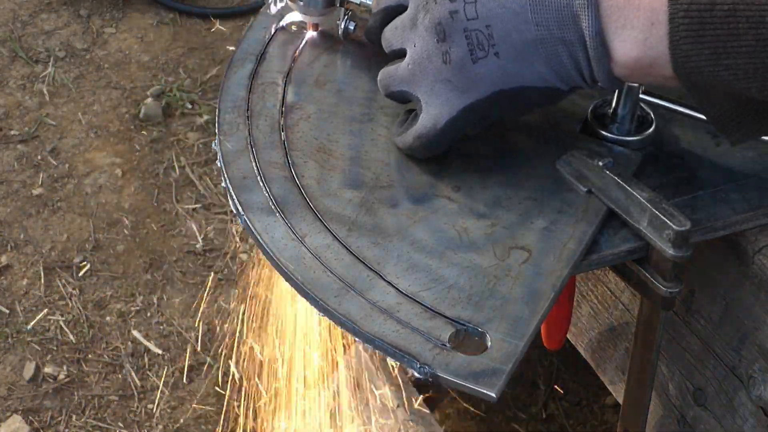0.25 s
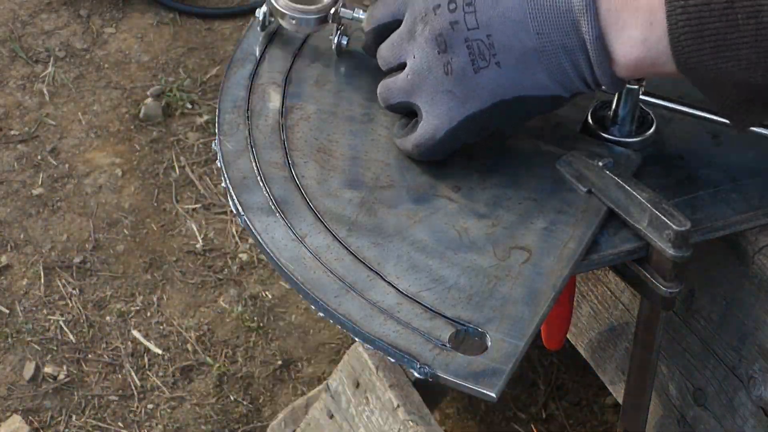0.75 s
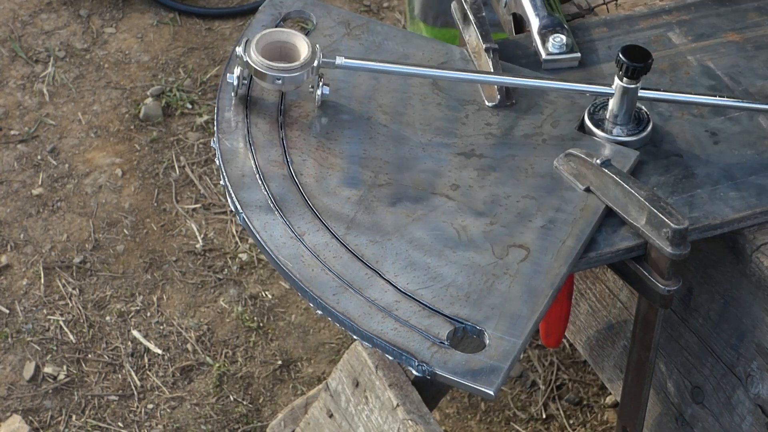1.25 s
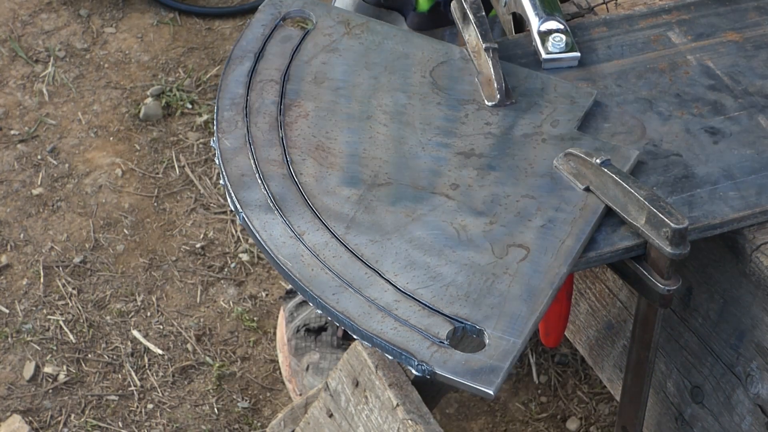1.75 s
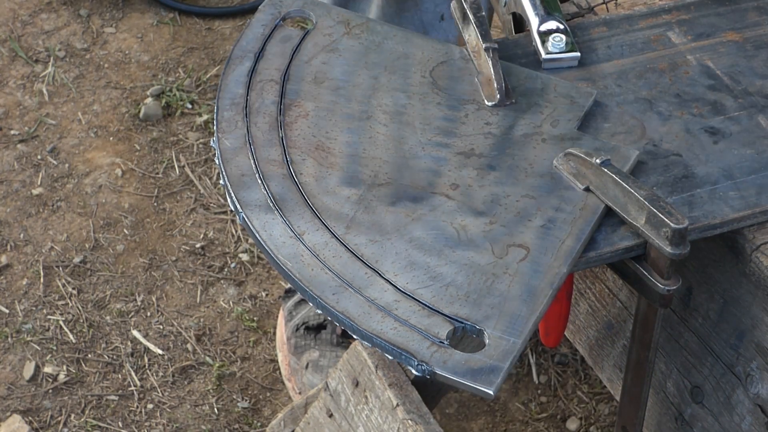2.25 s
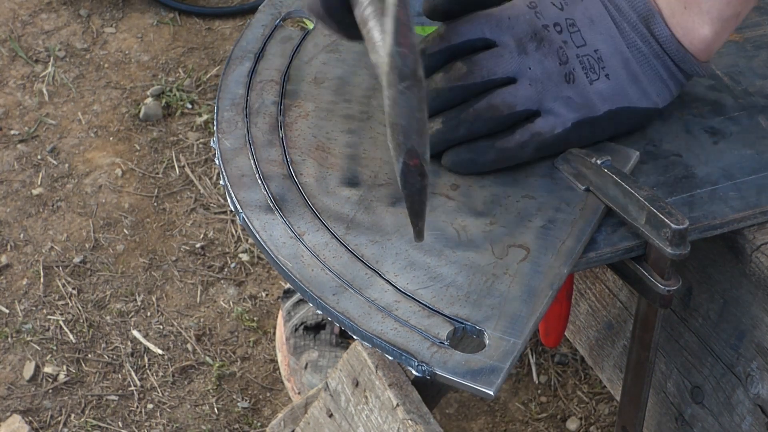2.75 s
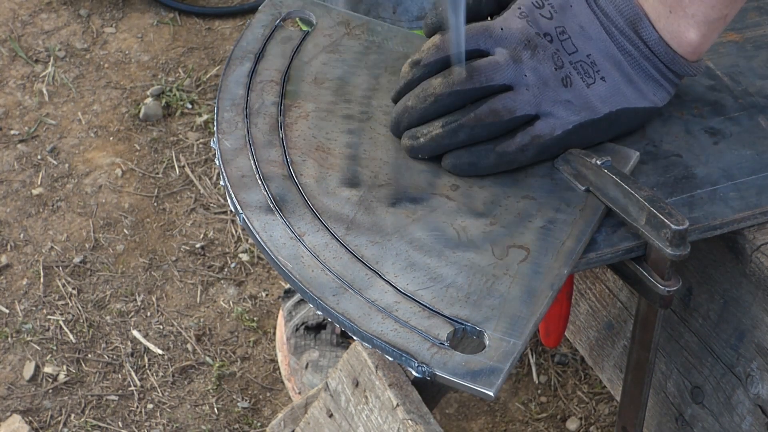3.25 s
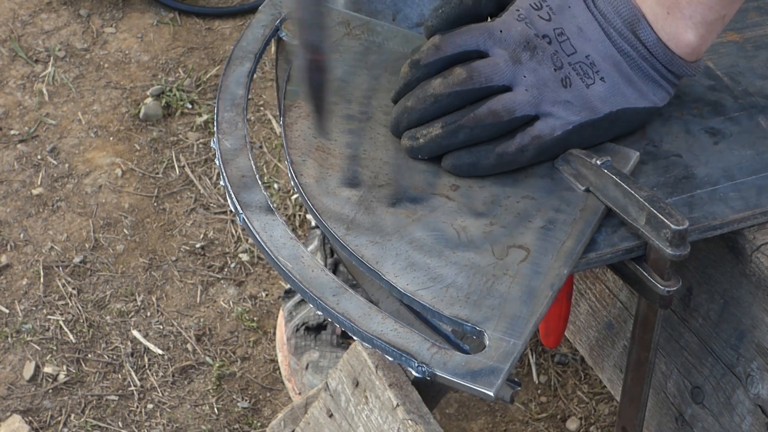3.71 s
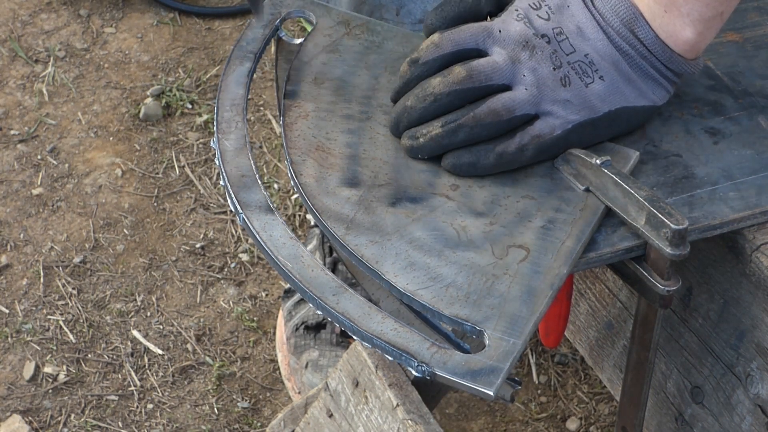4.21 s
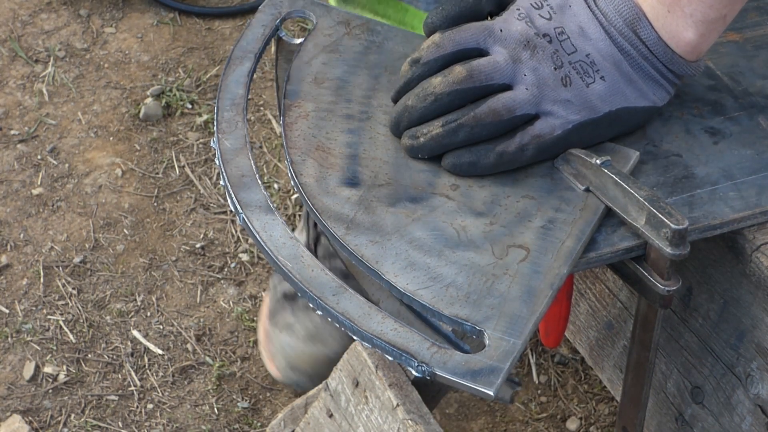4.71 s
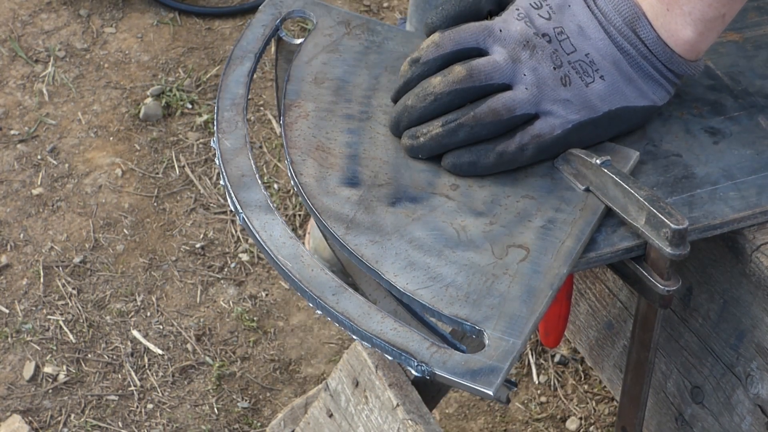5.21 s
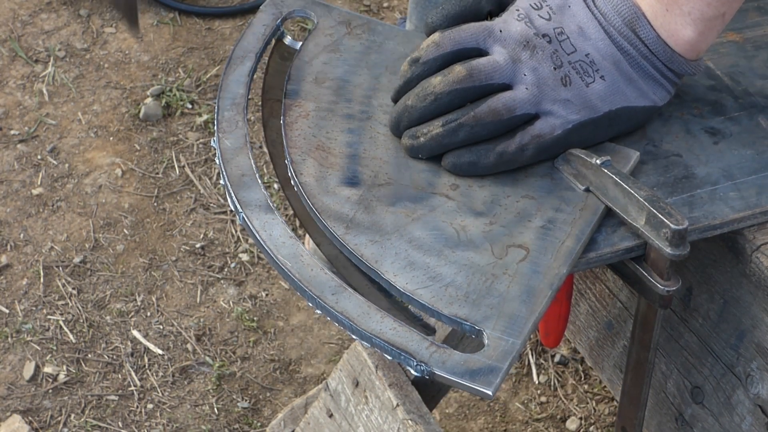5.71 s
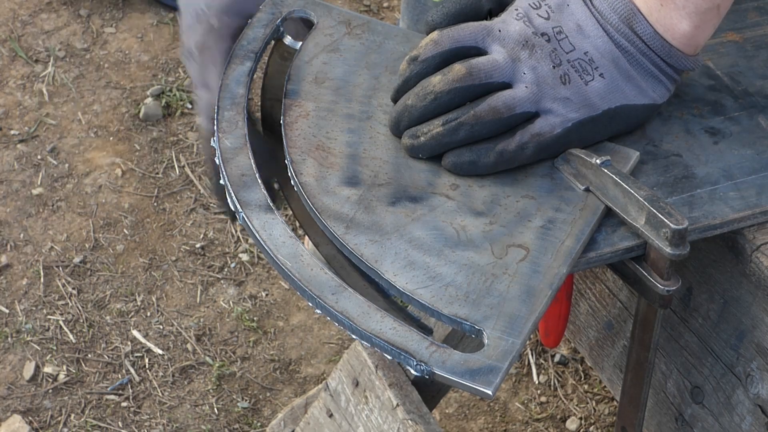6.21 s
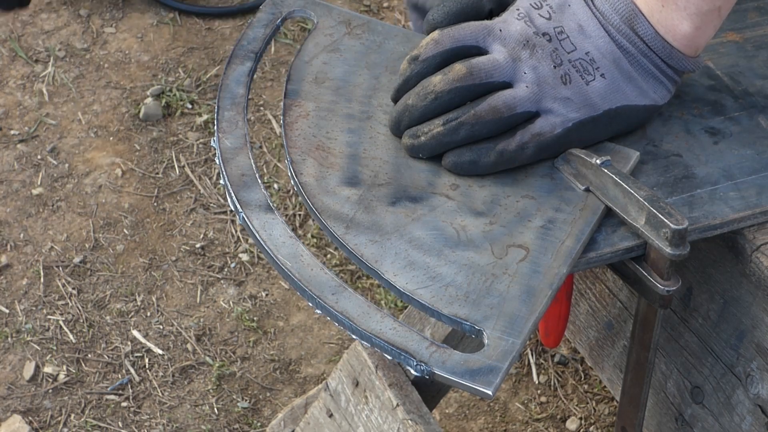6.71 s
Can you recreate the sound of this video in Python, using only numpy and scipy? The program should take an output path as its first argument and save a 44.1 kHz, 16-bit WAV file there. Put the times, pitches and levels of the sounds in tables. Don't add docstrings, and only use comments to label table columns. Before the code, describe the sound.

Harsh cutting-torch roar pops off into an air jet, followed by steady compressor drone and irregular metallic hammer strikes knocking an offcut loose.

```python
import sys
import numpy as np
from scipy import signal
from scipy.io import wavfile

SR = 44100
rng = np.random.default_rng(int(sys.argv[2]) if len(sys.argv) > 2 else 0)


def generate_wav(sig):
    pcm = np.round(np.clip(np.atleast_2d(sig).T, -1, 1) * 32767).astype(np.int16)
    wavfile.write(sys.argv[1], SR, pcm)


def attenuation_scalar(level_db):
    decades = np.asarray(level_db, float) / 20
    return 10 ** decades


N = 306936
TIME = np.arange(N) / SR

STROKE_HZ = 45.796
ARC_OFF_S = .64
# centre_s, fade_out_s, fade_in_s
SCENE_CHANGES = [
    (1.5637, 0.037, 0.029),
    (6.93, 0.035, 0.037),
]
# frequency_hz, width_hz, lift_db
CASING_RINGS = [(1510, 81, 3.5), (4045, 97, 10), (4975, 140, 6.5), (5800, 480, 6.5), (6890, 120, 7.5),
                (7510, 68, 11), (8270, 130, 6), (10260, 23, 1.5)]
# frequency_hz, likeness (0 to 1)
LIKENESS = [(60, 0.41), (150, 0.45), (380, 0.88), (950, 0.3), (2380, 0.75), (5980, 0.89), (15000, 0.26)]
# frequency_hz, left_minus_right_db
LEAN = [(60, -1), (150, -1), (380, -0.5), (950, 4), (2380, 4.5), (5980, 1.5), (15000, 3)]


def rms_one(x):
    return x / np.sqrt(np.mean(x ** 2) + 1e-20)


def in_time(rows, outside=None):
    return np.interp(TIME, *np.transpose(rows), left=outside, right=outside)


def at_hz(points, hz):
    table_hz, values = np.array(points).T
    return np.interp(np.log(hz), np.log(table_hz), values)


def ramp(start_s, takes_s):
    return np.clip((TIME - start_s) / takes_s, 0, 1)


def drift(rate_hz, size=N):
    r = np.exp(-80 * np.pi * rate_hz / SR)
    white = rng.standard_normal(size // 40 + 2002)
    slow = signal.lfilter([1], [1, -2 * r, r * r], white)[2000:]
    return np.interp(np.arange(size) / 40, np.arange(len(slow)), rms_one(slow))


def sides(db):
    return attenuation_scalar(np.array([[.5], [-.5]]) * db)


def strikes(rows):
    return sum(attenuation_scalar(db) * (np.arange(N) == round(s * SR)) for s, db in rows)


def ring(clicks, hz, t60):
    r = attenuation_scalar(-60 / (t60 * SR))
    w = 2 * np.pi * hz / SR
    return signal.lfilter([0, np.sin(w)], [1, -2 * r * np.cos(w), r * r], clicks + 1e-18)


def resonate(x, peaks):
    for hz, width_hz, db in peaks:
        r = np.exp(-np.pi * width_hz / SR)
        poles = [1, -2 * r * np.cos(2 * np.pi * hz / SR), r * r]
        peak = signal.lfilter([(1 - r * r) / 2, 0, (r * r - 1) / 2], poles, x)
        x = x + (attenuation_scalar(db) - 1) * peak
    return x


def banded_noise(spectrum, likeness, patchy_db, seconds=N / SR, lean=1):
    size = round(seconds * SR)
    edges = 22 * 2 ** np.arange(0, 9.8, .5)
    white = rng.standard_normal((2, 2, size))
    out = 0
    for k, (low, high) in enumerate(zip(edges, edges[1:])):
        hz = np.sqrt(low * high)
        if at_hz(spectrum, hz) < -50 or hz < spectrum[0][0]:
            continue
        band = signal.butter(2, [low, high], "band", fs=SR, output="sos")
        mid, side = signal.sosfilt(band, white[k % 2])
        alike = np.clip(at_hz(likeness, hz), 0, 1)
        gain = attenuation_scalar(at_hz(spectrum, hz) + patchy_db * drift(27, size=size)) * sides(lean * at_hz(LEAN, hz))
        out = out + gain * (np.sqrt(1 + alike) * mid + np.sqrt(1 - alike) * side * [[1], [-1]])
    return np.pad(rms_one(out), ((0, 0), (0, N - size)))


def arc_roar(likeness):
    # time_s, level_db
    arc_level = [(0.0, -21.5), (0.09, -25.5), (0.112, -20), (0.2, -21.5), (0.304, -23.5), (0.44, -20),
                 (0.46, -22), (0.624, -19), (0.64, -28)]
    # frequency_hz, density_db
    arc_spectrum = [(350, -43), (600, -6.5), (634, -26), (881, -12), (997, -16), (1640, -3), (2990, -9.5),
                    (3250, -8), (9620, -1.5), (14500, -9.5), (16000, -19)]
    # frequency_hz, width_hz, lift_db
    arc_rings = [(1600, 100, 5.5), (3990, 70, 7), (5280, 100, 6), (8050, 210, 5), (8800, 95, 4),
                 (9470, 98, 5), (9600, 44, 6), (11900, 67, 8)]
    size = round(.7 * SR)
    noise = banded_noise(arc_spectrum, likeness, 1.24, seconds=.7, lean=0)
    roar = rms_one(resonate(noise, arc_rings)[:, :size])
    roar = np.pad(roar, ((0, 0), (0, N - size)))
    return roar * attenuation_scalar(in_time(arc_level, outside=-90) + 0.32 * drift(40))


def sputter(arc):
    # start_s, pop_db, gap_delay_s
    sputters = [
        (0.608, -8, 0.0085),
        (0.619, -10, 0.0013),
        (0.632, -15, 0.0044),
    ]
    pops = np.zeros(N)
    for s, db, gap in sputters:
        arc = arc * (1 - 0.59 * np.exp(-((TIME - s - gap) / gap * 2) ** 2))
        pops += attenuation_scalar(db) * (TIME >= s) * np.exp(-np.abs(TIME - s) / .003)
    band = signal.butter(1, [250, 2200], "band", fs=SR, output="sos")
    return arc + signal.sosfilt(band, pops * rng.standard_normal(N))


def jet_db():
    trickle_db, air_db, opens_s, rise_s = -32, -27, .675, .02
    lift_s, lift_takes_s, turned_db = 0.846, .07, -3.5
    gust_s, gust_db, gust_rise_s, gust_dies_s = .778, 8, 0.013, 0.025
    splash_db, splash_grows_db_per_s, splash_lifted_db = -40, 26, -16

    lifted = ramp(lift_s, lift_takes_s)
    gust_age = np.maximum(TIME - gust_s - gust_rise_s, 0)
    gust = gust_db * ramp(gust_s, gust_rise_s) * np.exp(-gust_age / gust_dies_s)
    turning = turned_db * ramp(gust_s, lift_s - gust_s + lift_takes_s)
    air = trickle_db + (air_db - trickle_db) * ramp(opens_s, rise_s) + gust + turning
    splash = splash_db + splash_grows_db_per_s * (TIME - ARC_OFF_S) + splash_lifted_db * lifted
    silent = -90 * ((TIME < ARC_OFF_S) | (TIME > SCENE_CHANGES[0][0]))
    return air + silent, splash + silent - 90 * (lifted == 1)


def cooling_air(likeness):
    # frequency_hz, density_db
    air_spectrum = [(1470, -48), (2500, -14.5), (3060, -19), (3130, -25), (5440, -6), (5920, -10.5),
                    (9730, -4), (14400, -11), (16000, -15)]
    # frequency_hz, density_db
    splash_spectrum = [(1000, -8), (1600, 3), (2400, -6), (3800, 1), (5000, -15)]
    air_db, splash_db = jet_db()
    air = banded_noise(air_spectrum, likeness, 1.4, seconds=1.6, lean=0) * attenuation_scalar(air_db)
    splash = banded_noise(splash_spectrum, likeness, 1.3, seconds=1.0, lean=0) * attenuation_scalar(splash_db)
    return air + splash


def torch():
    # frequency_hz, likeness (0 to 1)
    torch_likeness = [(60, 0.7), (180, 0.97), (550, 0.66), (1650, 0.87), (4970, 0.89), (15000, 0.77)]
    return sputter(arc_roar(torch_likeness)) + cooling_air(torch_likeness)


def blow_colour(hz, bright_db, favoured_hz):
    return bright_db * np.log2(hz / 2000) + 9 * np.exp(-(np.log2(hz / favoured_hz) / .42) ** 2)


def plate_modes(age, bright_db, lasting, favoured_hz):
    # frequency_hz, level_db, t60_s
    modes = [(240, -30, 0.033), (335, -23, 0.15), (516, -10, 0.12), (726, -6, 0.042), (1010, -23, 0.05),
             (1040, -34, .05), (1110, -5.5, 0.12), (1300, -11, 0.073), (1397, 3, 0.08), (1534, -8, 0.16),
             (1584, -2, 0.043), (1780, 0.5, 0.06), (1877, 0.5, 0.045), (2177, 5.5, 0.081),
             (2200, -3, 0.077), (2400, 3, 0.2), (2530, 4, 0.072), (2900, -6, 0.043), (3350, -18, 0.044),
             (3520, -15, .04), (4500, -45, 0.022), (4900, 8, 0.039), (5670, -11, .03), (5840, 13, 0.029),
             (6400, -30, 0.022), (7800, 16, .025), (11950, 13.5, 0.034)]
    rattle = rng.standard_normal(len(age)) * np.exp(-age / (0.014 * lasting)) * 0.087
    rattle[0] = 1
    out = 0
    for hz, db, t60 in modes:
        uneven_db, apart_db = 2 * rng.standard_normal(2)
        gain = attenuation_scalar(db - 4.5 + blow_colour(hz, bright_db, favoured_hz) + uneven_db) * sides(apart_db)
        longest_s = 150 / hz
        out = out + gain * ring(rattle, hz, min(t60 * lasting, longest_s))
    return out


def clatter(age, bright_db, lasting, favoured_hz):
    # frequency_hz, level_db, decay_s
    clatter_bands = [(336, -14, 0.023), (725, -7, 0.04), (1240, -7, 0.024), (2200, -2, 0.031),
                     (3420, 14.5, 0.0029), (5500, 7.5, 0.01), (8000, 7, 0.0074), (11300, -10, 0.009),
                     (15000, -13, 0.003)]
    out = 0
    for hz, db, dies in clatter_bands:
        mid, left, right = rng.standard_normal((3, len(age))) * np.exp(-age / (dies * lasting))
        band = signal.butter(2, [hz / 1.35, min(hz * 1.35, .45 * SR)], "band", fs=SR, output="sos")
        noise = signal.sosfilt(band, mid + 0.32 * np.array([left, right])) / np.sqrt(hz / 20000)
        out = out + attenuation_scalar(db + blow_colour(hz, bright_db, favoured_hz)) * noise
    return out


def crack(age, bright_db):
    size = len(age)
    white = rng.standard_normal(size + 2) + .5 * rng.standard_normal((2, size + 2))
    return attenuation_scalar(-7 + 2.8 * bright_db) * np.diff(white, 2) * np.exp(-age / .0018)


def yard_echoes(hit, age):
    yard_db, yard_s = -22, .04
    echoes = rng.standard_normal((2, len(age))) * np.exp(-age / yard_s) / np.sqrt(yard_s * SR)
    return attenuation_scalar(yard_db + 12) * signal.fftconvolve(hit, echoes, axes=1)[:, :len(age)]


def hammer():
    # start_s, peak_db, brightness_db_per_octave, ring_time_factor, favoured_hz
    blows = [(3.009, -6, -4, 0.63, 1600), (3.017, -7, -7, 1, 2120), (3.028, -13, -10, 0.83, 2200),
             (3.246, -17, 5, .4, 6000), (3.401, 5.5, 4.5, 0.27, 5500), (3.405, -1.5, -2, 3.1, 1510),
             (4.16, -9.5, -4.5, 0.58, 1090), (4.483, -5.5, -8.5, 1.1, 2120), (4.490, -4, -3.5, 1, 2020),
             (4.502, -7, -6, 0.74, 2000), (4.7914, 3.5, -5, 1.15, 1300), (5.076, -15, 3, .7, 2200),
             (5.0818, 3.5, -6.5, 1.13, 2200), (5.087, -1, -1, 0.37, 5700), (5.363, 3, -3.5, 0.58, 5800),
             (5.376, -4, -7, 1.2, 1390), (5.441, -9, 0, 3, 3600), (6.426, -14, -8, 1.4, 398),
             (6.557, -19, -18, 0.49, 295)]
    size = round(.4 * SR)
    out = np.zeros((2, N + size))
    age = np.arange(size) / SR
    for s, peak_db, bright_db, lasting, favoured_hz in blows:
        hit = plate_modes(age, bright_db, lasting, favoured_hz)
        hit = hit + clatter(age, bright_db, lasting, favoured_hz)
        hit = hit + crack(age, bright_db)
        hit = hit / np.abs(hit).max()
        hit = hit + yard_echoes(hit, age)
        at = round(s * SR)
        out[:, at:at + size] += attenuation_scalar(peak_db) * hit
    return signal.sosfilt(signal.butter(2, 160, "high", fs=SR, output="sos"), out[:, :N])


def clinks():
    # start_s, level_db
    pings = [
        (4.7917, -19),
        (5.076, -28),
        (5.363, -17),
    ]
    # frequency_hz, level_db, t60_s
    small_scrap = [(12100, 6, .06), (12750, -3, .27), (13320, -7, .18), (14900, -20, 0.31)]
    # start_s, level_db
    small_touches = [
        (6.29, -35),
        (6.33, -41),
        (6.36, -36),
    ]
    # frequency_hz, level_db, t60_s
    large_scrap = [(5033, 3, 0.45), (5700, -1, 0.68)]
    # start_s, level_db
    large_touches = [
        (6.33, -32),
        (6.418, -29.5),
    ]
    out = ring(strikes(pings), hz=9100, t60=0.12)
    for modes, touches in ((small_scrap, small_touches), (large_scrap, large_touches)):
        for hz, db, t60 in modes:
            out = out + attenuation_scalar(db) * ring(strikes(touches), hz, t60)
    return out


def knock_phases(order):
    first, gap, share_kept = .195, .08, .7
    slap = np.arange(4)
    size = -(-share_kept) ** slap * np.where(slap == 0, .5, 1)
    return np.angle(np.exp(-2j * np.pi * np.outer(order, first + gap * slap)) @ size)


def drone(strokes, speed):
    # stroke_multiple, level_db
    free_partials = [(1, -47.5), (2, -20), (3, -15.5), (4, -27), (5, -6), (6, -17.5), (7, -12.5), (8, 1.5),
                     (9, -3.5), (10, -9.5), (11, -18), (12, 2.5), (13, -44), (14, -2), (15, -2.5),
                     (16, -7.5), (17, -20), (18, -9.5), (19, -37), (20, -31), (21, -12.5), (22, -9.5),
                     (23, -19.5), (24, -4), (25, -10), (26, -23), (27, -20), (28, -23), (29, -40.5),
                     (30, -18.5), (31, -11), (32, -15.5), (33, -15), (34, -9.5), (35, -22), (36, -20),
                     (37, -32), (38, -48), (39, -47), (40, -46), (41, -23), (42, -14.5), (43, -44),
                     (44, -40), (45, -15.5), (46, -35)]
    # stroke_multiple, level_db
    loaded_partials = [(1, -37), (2, -31), (3, -9.5), (4, -29), (5, -11), (6, -22), (7, -12), (8, -6.5),
                       (9, -11.5), (10, -16), (11, -10.5), (12, -6), (13, 3), (14, -3.5), (15, -25),
                       (16, -24), (17, -12), (18, -24), (19, -16), (20, -8), (21, -15), (22, -29),
                       (23, -33), (24, -20), (25, -24), (26, -11), (27, -5.5), (28, -10), (29, -9),
                       (30, -18)]
    loaded_db, labour_blur = 1.5, 4
    wobble_db, spread_rad, skew_rad = .8, .09, .16
    order, level_db = np.transpose(free_partials)
    load = np.clip((STROKE_HZ - speed) / 3, 0, 1)
    phase = knock_phases(order)
    out = 0
    for k, free_db in zip(order.astype(int), level_db):
        labour_db = np.interp(k, *np.transpose(loaded_partials)) + loaded_db
        db = free_db + load * (labour_db - free_db)
        wander = spread_rad * (1 + labour_blur * load) * np.sqrt(k / 12) * drift(2.3)
        apart = skew_rad * k / 12 * rng.standard_normal() * np.array([[.5], [-.5]])
        tone = np.cos(2 * np.pi * k * strokes + phase[k - 1] + wander + apart)
        gain = attenuation_scalar(db + wobble_db * drift(2.74)) * sides(at_hz(LEAN, k * STROKE_HZ))
        out = out + np.sqrt(2) * gain * tone
    return attenuation_scalar(-30.5) * out


def valve(strokes):
    # frequency_hz, density_db
    puff_spectrum = [(1200, 14), (2500, -16), (4000, -6), (6000, -2.5), (8000, -2), (10500, -1),
                     (13000, -7), (16000, -22)]
    opens, shuts, leak = 0.1, 0.57, 0.32
    strength = attenuation_scalar(5.0 * rng.uniform(-1, 1, 400))
    since = strokes % 1
    puff = (1 - np.exp(-since / opens)) * np.exp(-(since / shuts) ** 4)
    shape = strength[strokes.astype(int)] * (leak + puff)
    hiss = resonate(banded_noise(puff_spectrum, LIKENESS, patchy_db=1.5), CASING_RINGS[1:])
    return rms_one(shape) * hiss


def compressor():
    # time_s, stroke_rate_hz
    sag = [
        (0, 42.6),
        (.13, 43.0),
        (.29, 41.2),
        (.42, 41.8),
        (.52, 42.3),
        (.64, 42.4),
        (.69, 45.796),
    ]
    # frequency_hz, density_db
    casing_spectrum = [(15, -61), (25, -34), (175, -13), (223, -16), (277, -11.5), (363, 0.5), (489, -14.5),
                       (545, -0.5), (887, -9), (1130, -5.5), (3160, -12.5), (7710, -19), (12500, -16),
                       (14800, -34.5), (16000, -91)]
    valve_opens, skipped = .35, -0.34
    speed = in_time(sag)
    lost = np.cumsum(STROKE_HZ - speed) / SR
    strokes = STROKE_HZ * TIME + 1 - valve_opens + lost[-1] - lost
    strokes = strokes + (1 + skipped) * (TIME < SCENE_CHANGES[0][0])
    swell = attenuation_scalar(0.93 * np.cos(2 * np.pi * (strokes - .25)))
    casing = rms_one(resonate(banded_noise(casing_spectrum, LIKENESS, patchy_db=1.5), CASING_RINGS))
    air = attenuation_scalar(-32.0) * valve(strokes) + attenuation_scalar(-25) * swell * casing
    shaded = signal.sosfiltfilt(signal.butter(8, 10700, fs=SR, output="sos"), air)
    return drone(strokes, speed) + shaded + 0.53 * (air - shaded)


def breeze():
    # frequency_hz, density_db
    wind_spectrum = [(15, -2), (30, -4), (60, -14), (120, -4), (220, -0.5), (400, -14), (16000, -90)]
    # frequency_hz, likeness (0 to 1)
    wind_likeness = [(25, .4), (60, .6), (200, 0.91)]
    return attenuation_scalar(-51) * banded_noise(wind_spectrum, wind_likeness, patchy_db=1.0, lean=0)


def ducking():
    # start_s, duck_db
    ducks = [
        (3.008, 3.5),
        (3.401, 17),
        (4.484, 4),
        (4.791, 9.5),
        (5.08, 9.5),
        (5.363, 9),
    ]
    attack_s, recover_s, recover_s_per_db = .012, .11, .002
    linger_share, linger_s = 0.16, 0.56
    db = np.zeros(N)
    for s, duck_db in ducks:
        age = np.maximum(TIME - s, 0)
        back_s = recover_s + recover_s_per_db * duck_db
        held = (1 - linger_share) * np.exp(-(age / back_s) ** 2) + linger_share * np.exp(-age / linger_s)
        db -= duck_db * (1 - np.exp(-age / attack_s)) * held
    return attenuation_scalar(db)


def slow_gain_db():
    change_s, last_change_s = SCENE_CHANGES[0][0], SCENE_CHANGES[1][0]
    held_db, creep_db_per_s = -14.5, 5.2
    settled_db, settle_db, settle_s = 0.63, -3.5, 0.33
    last_shot_db = -14.5
    first = held_db + creep_db_per_s * np.maximum(TIME - ARC_OFF_S, 0)
    second = settled_db + settle_db * np.exp(-np.abs(TIME - change_s) / settle_s)
    return np.select([TIME < change_s, TIME < last_change_s], [first, second], last_shot_db)


def scene():
    gain_db = slow_gain_db()
    bench = attenuation_scalar(gain_db) * compressor() + hammer() + clinks()
    return ducking() * bench + torch() + attenuation_scalar(0.31 * gain_db) * breeze()


def band_limit(x):
    return signal.sosfilt(signal.butter(12, 16100, fs=SR, output="sos"), x)


def record(dry):
    fade = 1
    for s, fade_out_s, fade_in_s in SCENE_CHANGES:
        away = np.where(TIME < s, (s - TIME) / fade_out_s, (TIME - s) / fade_in_s)
        fade = fade * np.clip(away, .003, 1) ** 2.0
    level = np.tanh(dry * fade / 1.01) * 1.09 - 0.0032 * fade
    level = signal.sosfiltfilt(signal.cheby2(10, 40, 16100, fs=SR, output="sos"), level)
    return band_limit(level)


dry = scene()
out = record(dry)
generate_wav(out)
```